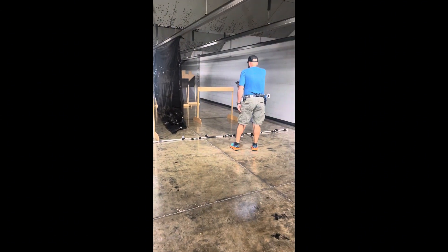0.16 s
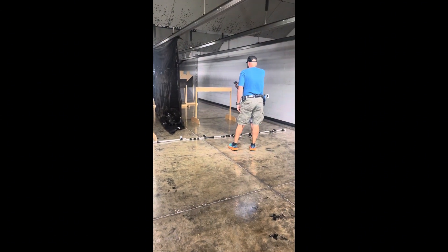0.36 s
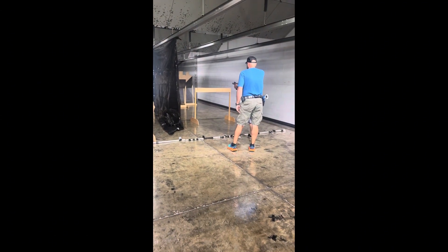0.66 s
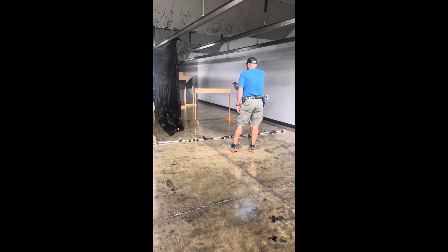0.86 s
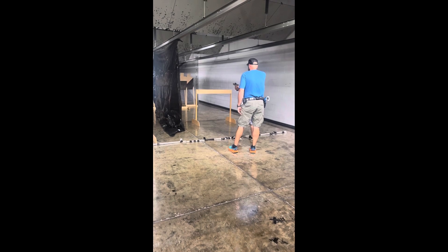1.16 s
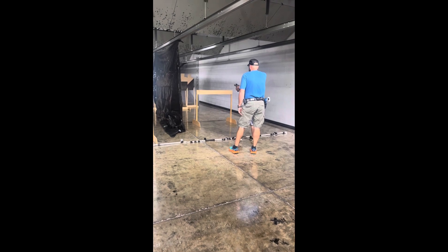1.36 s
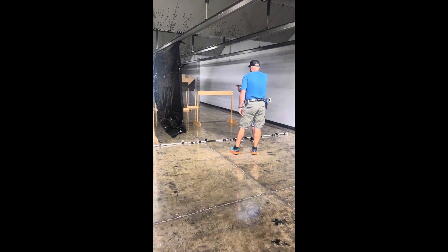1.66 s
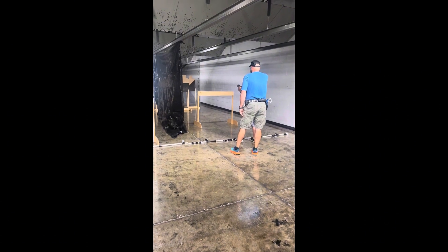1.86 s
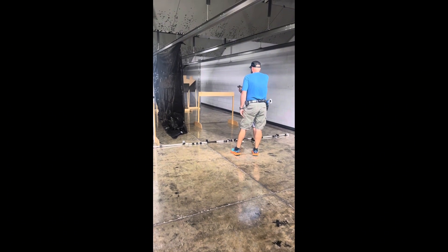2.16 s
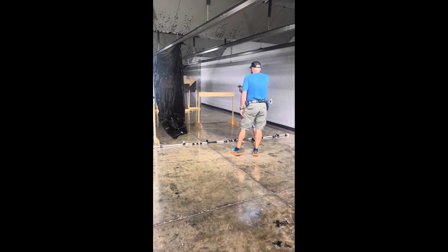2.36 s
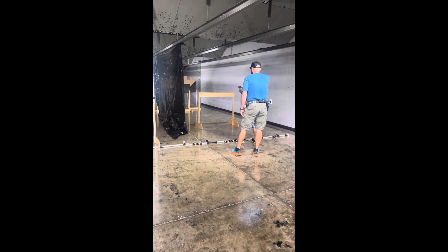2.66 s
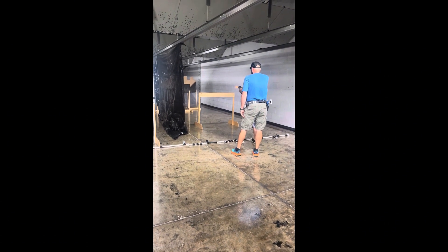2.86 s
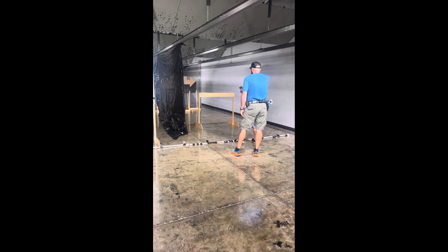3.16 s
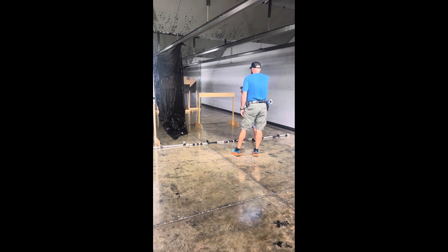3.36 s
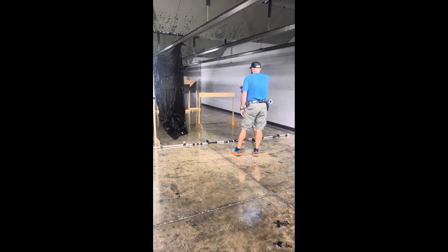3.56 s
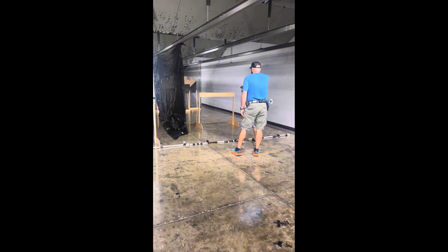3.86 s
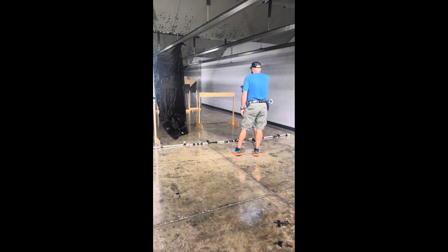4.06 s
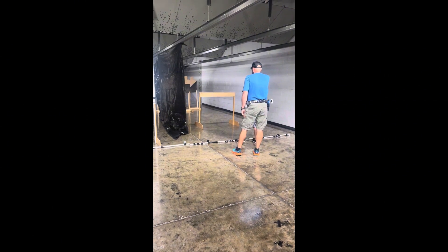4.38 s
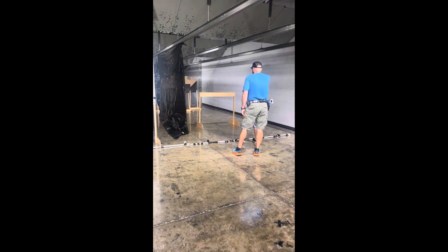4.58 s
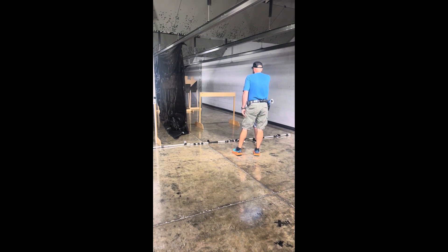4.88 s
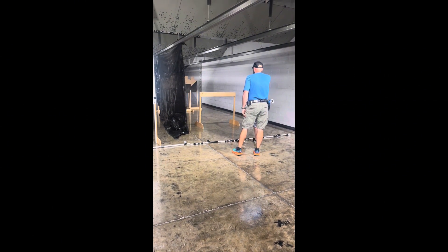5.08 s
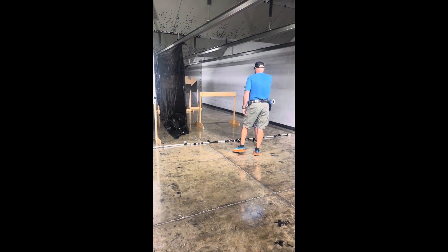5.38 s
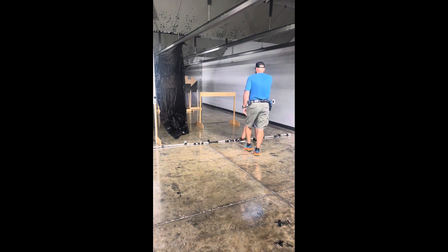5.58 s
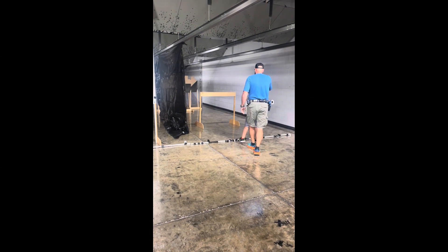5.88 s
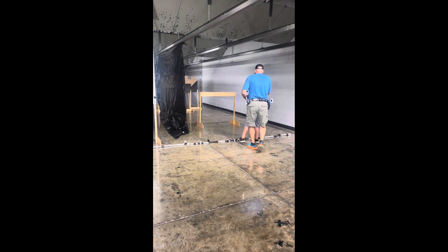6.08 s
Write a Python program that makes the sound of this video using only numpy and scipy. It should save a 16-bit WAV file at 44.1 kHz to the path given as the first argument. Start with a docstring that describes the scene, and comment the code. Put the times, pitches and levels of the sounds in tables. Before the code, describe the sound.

A handgun fires four quick pairs of shots inside a long concrete shooting range. Each shot is a short, sharp crack with a sinking low thump, hard early echoes, a duller slap from the far wall and a long tail. Ventilation rumbles very quietly underneath, and spent cases tinkle faintly on the floor between pairs and at the end. Stereo camera microphone a few metres behind the shooter.

```python
"""Ventilation rumbles in a concrete indoor range: noise shaped like duct rumble, plus fan tones.
Soon a pistol fires four quick pairs of shots, a few metres from a stereo camera.
Each starts as a crack of noise with a thump of sinking pitch, then echoes return from nearby surfaces.
A slap comes back from the far wall and the long hall's tail dies away, treble first.
From the first pair on, spent brass cases tinkle faintly on the floor: short ticks and ringing tones."""
import sys
import numpy as np
from scipy import signal
from scipy.fft import rfft, irfft, next_fast_len
from scipy.io import wavfile
from scipy.ndimage import uniform_filter1d, map_coordinates

SR = 44100
rng = np.random.default_rng(int(sys.argv[2]) if len(sys.argv) > 2 else 0)


def dump(signal):
    """Clip the signal to [-1, 1] and save it as 16-bit WAV at the path in sys.argv[1]."""
    limited = np.clip(np.atleast_2d(signal).T, -1, 1)
    pcm = np.round(limited * 32767).astype(np.int16)
    wavfile.write(sys.argv[1], SR, pcm)


N = 274743  # length in samples


def amp(db):
    """Turn decibels into a plain loudness factor."""
    return 10 ** (np.asarray(db) / 20)


def unit(x):
    """Scale a signal to an average strength (rms) of 1."""
    return x / np.sqrt(np.mean(x ** 2) + 1e-20)


def along(points, hz):
    """Read a table of (f/Hz, value) between its points, on a log frequency axis."""
    f, value = np.transpose(points)
    return np.interp(np.log(hz + 1), np.log(f + 1), value)


def add(track, s, sound):
    """Mix a sound into the track from time s (seconds) on, cutting what runs past the end."""
    part = track[:, round(s * SR):][:, :sound.shape[-1]]
    part += sound[..., :part.shape[-1]]


def swell(t, time):
    """Rise to 1 at the given time, then die away."""
    return (t / time * np.exp(1 - t / time)) ** 2


def flutter(t, depth_db=0.74, rate=170):
    """Echoes arrive in clumps, so their level wanders between random points, rate of them a second."""
    knots = rng.standard_normal(int(t[-1] * rate) + 4)
    return amp(depth_db * map_coordinates(knots, [t * rate], order=1))


def arrival(t, delay, db, scatter, rise=0.0013):
    """Power of one wave front, smeared over the scatter time (s); rise is in seconds too."""
    age = np.maximum(t - delay, 0)
    return (amp(db) * (1 - np.exp(-age / rise)) * np.exp(-age / scatter)) ** 2


def fronts(t, paths):
    """Level of several wave fronts, each broken up by beams and posts."""
    power = sum(arrival(t, *path) for path in paths)
    return np.sqrt(power) * unit(flutter(t, depth_db=4.0, rate=760))


# how far the left microphone port leads the right: (f/Hz, phase/radians)
PORT_PHASE = [(100, -0.2), (400, -0.2), (600, 0.4), (1700, 0), (2200, 0.3), (2500, 1.5), (3100, 1.94),
              (3750, 1), (4450, 1.2), (4950, -0.1), (5700, 0.9), (7700, 3.1), (11000, 6.24), (14300, 9.3),
              (15700, 10.2)]
# how alike the two ports sound: (f/Hz, likeness 0-1)
PORT_LIKENESS = [(60, 1), (250, 1), (550, 0.85), (2000, 0.66), (3300, .4), (4400, 0.42), (5300, 0.91),
                 (6500, 0.98), (7700, 1), (9500, 0.92), (15000, .85)]


def at_ports(white, spectrum):
    """Colour two white noises and blend them into a sound field of rms 1 at the two ports."""
    size = white.shape[-1]
    hz = np.fft.rfftfreq(size, 1 / SR)
    # the less alike the ports, the more of the second noise, with opposite signs at the two
    turn = np.arccos(np.clip(along(PORT_LIKENESS, hz), 0, 1)) / 2
    coloured = rfft(white) * amp(along(spectrum, hz))
    common, apart = coloured * [np.cos(turn), np.sin(turn)]
    lead = np.exp(.5j * along(PORT_PHASE, hz))  # half the phase goes to each port
    return unit(irfft([(common + apart) * lead, (common - apart) / lead], size))


# the recorder's gain on the rumble through time: (t/s, level/dB)
RUMBLE_GAIN = [(0, -65), (.7, -64.5), (2.1, -63.5), (3.6, -72), (4.65, -67.5), (5.8, -70.5), (6.23, -66)]
# colour of the duct rumble: (f/Hz, relative level/dB)
VENT = [(15, -54), (30, -40), (45, -22), (62, -4.5), (95, -3.5), (160, -7), (250, -13.5), (340, -15.5),
        (372, -32.5), (460, -27), (560, -37.5), (850, -36), (2200, -46), (4000, -54), (6000, -56),
        (8000, -62), (16000, -66.5)]
# fan tones: (f/Hz, peak level/dB against the rumble's rms)
FAN = [(215, -14.5), (411.5, -16), (806, -32.5)]


def ventilation():
    """Steady duct rumble and fan tones, raised and lowered together by the recorder's automatic gain."""
    t = np.arange(N) / SR
    gain = amp(np.interp(t, *np.transpose(RUMBLE_GAIN)))
    rumble = at_ports(rng.standard_normal((2, next_fast_len(N))), VENT)[:, :N]
    tones = sum(amp(db) * np.sin(2 * np.pi * (hz * t + rng.random())) for hz, db in FAN)
    return gain * (rumble + tones)


# colour of the direct crack of the muzzle: (f/Hz, relative level/dB)
CRACK = [(100, -15.5), (400, -2), (900, -1), (2200, 2.5), (3500, -9), (5400, -4.5), (8000, -7.5),
         (12000, -10), (16000, -19)]


def muzzle_crack(t):
    """Behind the muzzle the direct sound is thin: a burst of noise that fades in milliseconds."""
    noise = at_ports(rng.standard_normal((2, len(t))), CRACK)
    return noise * np.sqrt(arrival(t, delay=0, db=0, scatter=0.0056))


# resonances between the near walls: (f/Hz, level/dB before a small random change)
BAY = [(458, -3), (618, -5), (667, -4), (758, -3), (980, -11), (1135, -5), (2250, -17.5)]


def bay(t, swell_time=0.009, spread_db=0.99, port_spread=0.89):
    """The near walls pass the blast back and forth: their resonances swell and fade quickly."""
    ring = 0
    for hz, db in BAY:
        level = amp(db + rng.normal(0, spread_db))
        # a random phase (radians), a little different at each port
        phase = rng.uniform(0, 2 * np.pi) + rng.normal(0, port_spread, (2, 1))
        ring = ring + level * np.sin(2 * np.pi * hz * t + phase)
    return ring * swell(t, swell_time)


# time the hall's sound takes to fall by 60 dB: (f/Hz, t/s)
HALL_T60 = [(100, 2.46), (300, 1), (900, 0.88), (2000, 0.96), (4000, 0.84), (6000, 0.77), (10000, 0.59),
            (16000, .42)]


def die_away(x, patchy_db=2.0):
    """Air and walls swallow the treble first; the fading is uneven, in random patches of pitch and time."""
    hz, t, z = signal.stft(x, SR, nperseg=512)
    patches = rng.standard_normal(z.shape[1:])
    patches = uniform_filter1d(patches, size=2, axis=0)  # smooth across pitch
    patches = uniform_filter1d(patches, size=5, axis=1)  # smooth through time
    gain_db = patchy_db * unit(patches) - 60 * t / along(HALL_T60, hz)[:, None]
    return signal.istft(z * amp(gain_db), SR, nperseg=512)[1][:, :x.shape[-1]]


# colour of the hall's tail before it dies away: (f/Hz, relative level/dB)
HALL = [(40, -29.5), (130, -10.5), (210, -6), (310, 0), (480, -5), (800, 2), (1100, 0), (1600, -4),
        (2150, -5), (3000, -7), (4200, -9.5), (5400, -10.5), (7000, -15.5), (10000, -16.5), (16000, -27.5)]


def hall_tail(t, diffuse, build_s=0.0085):
    """The long hall fills with scattered sound, which then dies away unevenly."""
    return die_away(at_ports(diffuse, HALL)) * (1 - np.exp(-t / build_s)) * flutter(t)


# echoes from side walls and ceiling: (delay t/s, level/dB, scatter time t/s)
PATHS = [(.0072, 5.8, 0.0045), (0.0157, 5.2, .003), (.030, -8, .006)]
# colour of these echoes: (f/Hz, relative level/dB)
BLAST = [(40, -17.5), (150, -15), (400, -4.5), (700, 4), (1100, -15), (1500, -8), (2200, -5.5),
         (3500, -19.5), (5400, -19), (8000, -16), (12000, -23), (16000, -22.5)]


def near_echoes(t, near):
    """The hard surfaces nearby return the blast as early wave fronts, which carry its weight."""
    return at_ports(near, BLAST) * fronts(t, PATHS)


# the late slap from the far wall and its scatter: (delay t/s, level/dB, scatter time t/s)
FAR_WALL = [(.0803, 5, .004), (.090, -7, .012)]
# colour of the slap: (f/Hz, relative level/dB)
SLAP = [(100, -20), (400, -6.5), (800, 5.5), (1500, -7.5), (2500, -6.5), (4000, -18.5), (7000, -30.5),
        (16000, -51)]


def far_slap(t, far):
    """The far wall sends back a late, duller wave front."""
    return at_ports(far, SLAP) * fronts(t, FAR_WALL)


# shots, also played by thumps(): (t/s, blast level/dB, reverberation level/dB,
# bass level/dB before the trims below, low ring level/dB, thump level/dB, starting thump f/Hz)
SHOTS = [(0.8175, -30.5, -31, -33, -30, -33, 140), (1.116, -30, -32, -30, -34.5, -25.5, 150),
         (2.2626, -30.5, -30, -32, -29, -37.5, 140), (2.8782, -29.5, -31.5, -49.5, -31, -36.5, 140),
         (3.703, -31.5, -31, -47, -49, -32, 190), (4.0298, -30.5, -32, -60, -51, -46, 135),
         (4.7764, -29, -31, -50, -43, -31, 195), (5.0725, -28.5, -32, -44, -45, -36, 140)]


def pistol(same=.45, bay_db=-4.5):
    """Each shot: a dry crack, wall resonances, hard early echoes, a far slap and the hall's tail."""
    out, t = np.zeros((2, N)), np.arange(3 * SR // 2) / SR
    walls = rng.standard_normal((3, 2, len(t)))
    for s, blast_db, hall_db, *_ in SHOTS:
        # the shooter barely moves, so part of the echo pattern repeats from shot to shot
        fresh = rng.standard_normal(walls.shape)
        near, far, diffuse = np.sqrt(same) * walls + np.sqrt(1 - same) * fresh
        blast = muzzle_crack(t) + amp(bay_db) * bay(t) + near_echoes(t, near) + far_slap(t, far)
        add(out, s, amp(blast_db) * blast + amp(hall_db) * hall_tail(t, diffuse))
    return out


# colour of the boom: (f/Hz, relative level/dB)
BASS = [(20, -15.5), (45, -5.5), (90, -0.5), (170, -8.5), (300, -17.5), (600, -36.5), (2000, -97.5)]


def boom(t, push_s=0.018, linger_db=-11, linger_t60=0.4):
    """The bass of a blast: one push, then the hall's lowest modes linger."""
    linger = amp(linger_db - 60 * t / linger_t60) * (1 - np.exp(-t / push_s))
    return at_ports(rng.standard_normal((2, len(t))), BASS) * (swell(t, push_s) + linger)


# the space between floor and beams: (f/Hz, swell time t/s)
LOW_RING = (270, 0.0086)


def low_ring(t):
    """The space between floor and beams rings briefly at one low pitch."""
    hz, swell_s = LOW_RING
    return swell(t, swell_s) * np.sin(2 * np.pi * hz * t)


SWELL_CYCLES = 1.05  # swings peak after about one cycle of their starting pitch: low ones last longer
DEEP_HZ, DEEP_DB = 58, 0.5  # the deepest swing; its level is against the bass level it is given
SAG_S = 0.045  # a thump's pitch sinks by a factor of e in this time


def low_end(t, bass_db, thump_db, thump_hz, port_gap_s=.0006):
    """The air swings after a blast: a quick, sinking thump over a deep, slow one."""
    ports = np.array([t, t + port_gap_s])  # the two ports get the swings a moment apart
    cycles = thump_hz * SAG_S * (1 - np.exp(-ports / SAG_S))
    thump = swell(t, SWELL_CYCLES / thump_hz) * np.sin(2 * np.pi * cycles)
    deep = swell(t, SWELL_CYCLES / DEEP_HZ) * np.sin(2 * np.pi * DEEP_HZ * ports)
    return amp(thump_db) * thump + amp(bass_db + DEEP_DB) * deep


THUMP_LAG_S = 0.005  # a shot's thump follows its crack
# a second heavy thump follows the first shot:
# (t/s, bass level/dB before the DEEP_DB trim, thump level/dB, starting thump f/Hz)
LATE_THUMP = (0.87, -38, -29, 140)


def thumps(boom_db=-4):
    """The weight of each shot: a boom, the ring between floor and beams and the swinging air."""
    out, t = np.zeros((2, N)), np.arange(SR) / SR
    for s, _, _, bass_db, ring_db, thump_db, thump_hz in SHOTS:
        add(out, s, amp(bass_db + boom_db) * boom(t) + amp(ring_db) * low_ring(t))
        add(out, s + THUMP_LAG_S, low_end(t, bass_db, thump_db, thump_hz))
    late_s, *late_swing = LATE_THUMP
    add(out, late_s, low_end(t, *late_swing))
    return out


# bounces of brass on concrete: (t/s, level/dB before the common level_db trim)
CASE_HITS = [(1.835, -75), (3.37, -76), (5.5894, -80), (6.039, -82.5), (6.1888, -73)]
# ringing tones of a case: (f/Hz, level/dB before a small random change, time to fall by 60 dB t/s)
BRASS = [(5150, -5, .06), (5450, -9, .05), (8940, -16, .12), (12350, -10, .2), (12520, -13, .16)]


def cases(tick_db=-6, tick_t60=0.043, level_db=-6):
    """Each bounce of a spent case ticks and rings its modes at new strengths."""
    out, t = np.zeros((2, N)), np.arange(SR // 2) / SR
    for s, db in CASE_HITS:
        ring = 0
        for hz, mode_db, t60 in BRASS:
            fade = amp(mode_db + rng.normal(0, 1) - 60 * t / t60)
            ring = ring + fade * np.sin(2 * np.pi * (hz * t + rng.random((2, 1))))
        tick = amp(tick_db - 60 * t / tick_t60) * rng.standard_normal((2, len(t)))
        add(out, s, amp(db + level_db) * (ring + tick))
    return out


def scene():
    """Everything heard in the range."""
    return ventilation() + pistol() + thumps() + cases()


def record(dry, ceiling_db=-18, low_cut_hz=35, top_hz=16150, edge_hz=500):
    """The camera rounds off the highest peaks, weakens the deepest bass and cuts all above top_hz."""
    held = dry / (1 + (dry / amp(ceiling_db)) ** 4) ** (1 / 4)
    low_cut = signal.butter(2, low_cut_hz, "highpass", fs=SR, output="sos")
    held = signal.sosfilt(low_cut, held)
    size = next_fast_len(N + SR)
    # the treble fades out smoothly over the last edge_hz below top_hz
    edge = np.clip((top_hz - np.fft.rfftfreq(size, 1 / SR)) / edge_hz, 0, 1)
    return irfft(rfft(held, size) * np.sin(np.pi / 2 * edge) ** 2, size)[:, :N]


dry = scene()
out = record(dry)
dump(out)
```